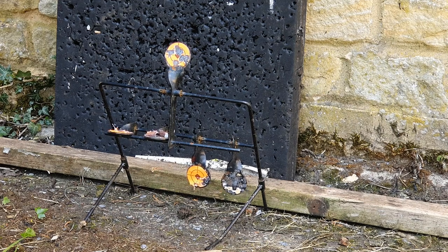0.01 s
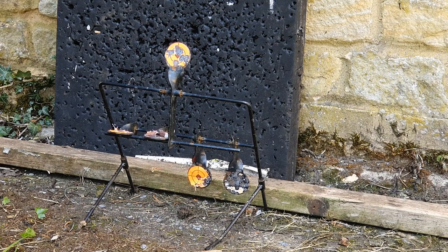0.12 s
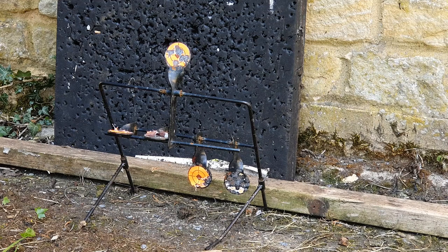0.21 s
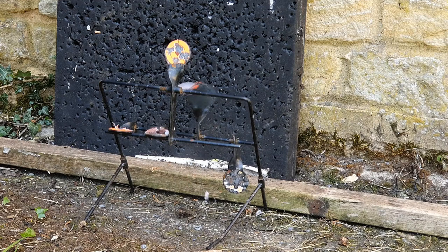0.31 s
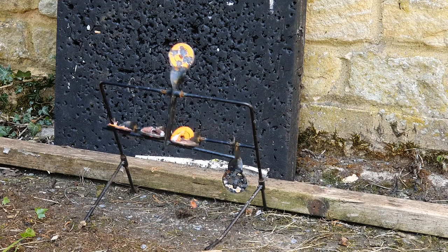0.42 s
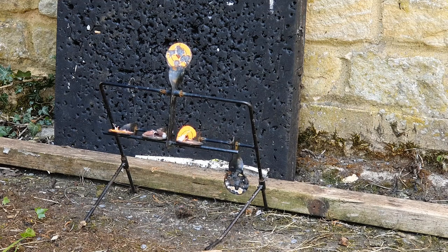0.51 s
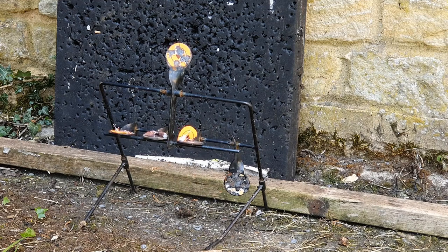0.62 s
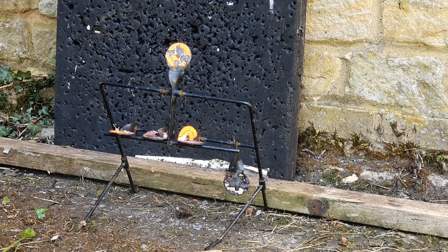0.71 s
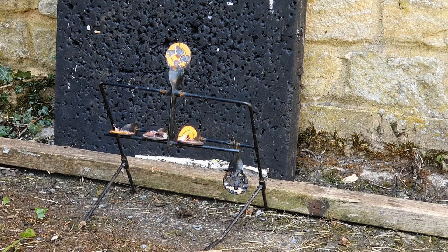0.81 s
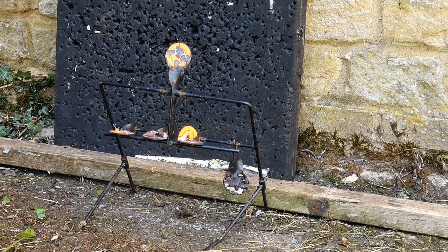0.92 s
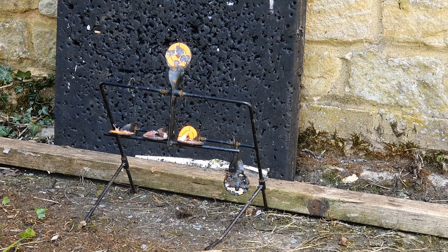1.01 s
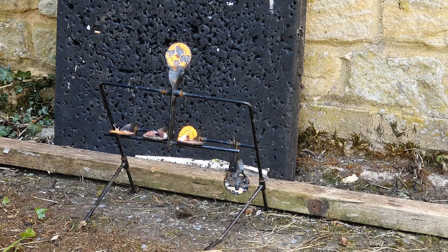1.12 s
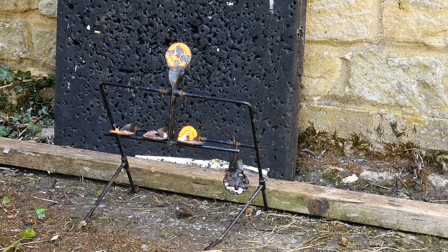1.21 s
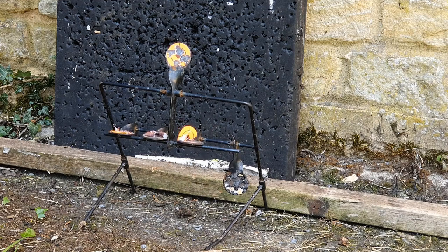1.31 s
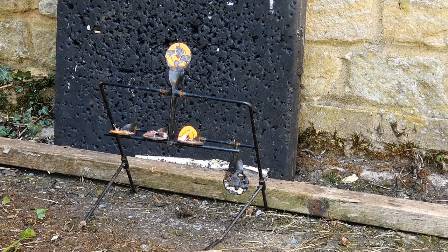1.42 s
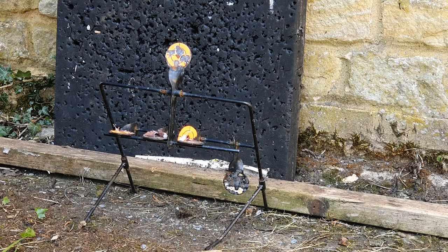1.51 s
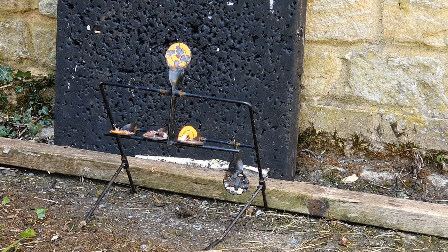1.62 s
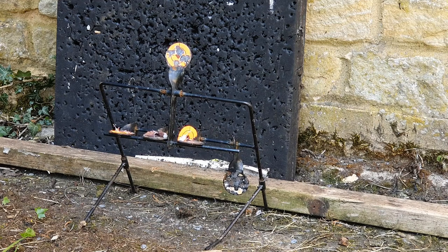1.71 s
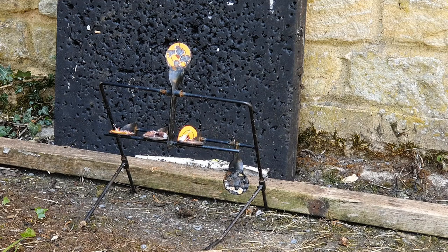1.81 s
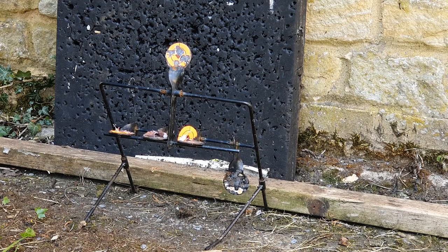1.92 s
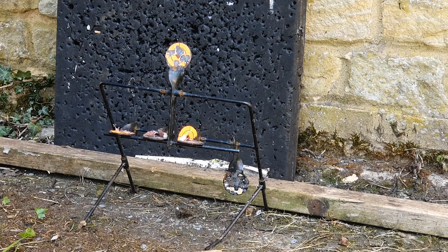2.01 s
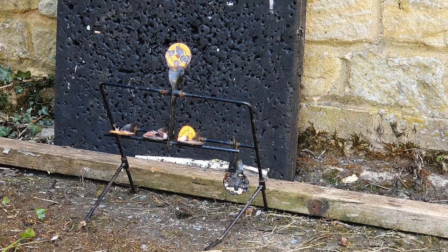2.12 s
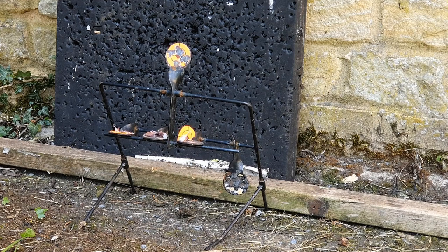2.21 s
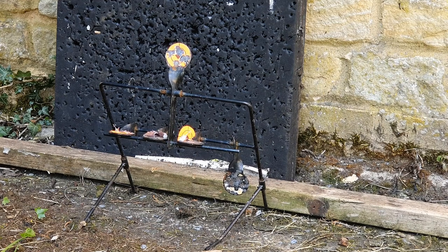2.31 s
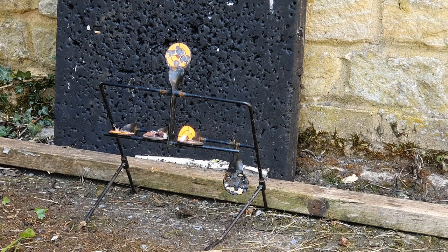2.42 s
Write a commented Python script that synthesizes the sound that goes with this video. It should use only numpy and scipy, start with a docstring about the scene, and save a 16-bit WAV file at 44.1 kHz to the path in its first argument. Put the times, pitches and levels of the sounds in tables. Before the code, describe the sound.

An air rifle shot hits a steel spinner target: near 0.24 s two sharp snaps with an air hiss and dull thud, a loud pellet smack at 0.27, then bright clangs at 0.38 and rapid rattling until 0.5, damped quickly with a short garden echo. Faint whistling birds come and go over low gusty microphone wind; a tiny tick at 1.47 and soft rustle at 1.9, faint clink at 2.13.

```python
"""An air rifle fires in a walled garden: two sharp snaps, a hiss of air and a dull thud.
The pellet smacks a steel spinner, which swings up, clangs against its stop and rattles briefly:
pulses and pings for the cracks, struck modes and noise for the steel.
A small tick and a soft rustle of shaped noise follow, with gliding-tone birds
and a light wind of gusty low noise on the microphone."""
import sys
import numpy as np
from scipy import signal
from scipy.fft import rfft, irfft, next_fast_len
from scipy.io import wavfile
from scipy.ndimage import map_coordinates

SR = 44100
rng = np.random.default_rng(int(sys.argv[2]) if len(sys.argv) > 2 else 0)


def generate_wav(signal):
    """Clip the signal to [-1, 1] and save it as 16-bit WAV at the path in sys.argv[1]."""
    frames = np.transpose(np.atleast_2d(signal))
    scaled = np.clip(frames, -1, 1) * 32767
    pcm = np.round(scaled).astype(np.int16)
    wavfile.write(sys.argv[1], SR, pcm)


N = 110250


def amp(db):
    """Decibels to gain."""
    return 10 ** (np.asarray(db) / 20)


def unit(x):
    """Scale to rms 1."""
    return x / np.sqrt(np.mean(x ** 2) + 1e-20)


def along(points, hz):
    """Interpolate (Hz, value) points on a log-frequency axis."""
    point_hz, value = np.transpose(points)
    return np.interp(np.log(hz + 1), np.log(point_hz + 1), value)


def clock():
    """Time of each sample, s."""
    return np.arange(N) / SR


def pan(left_minus_right_db):
    """Left and right gains for a level difference."""
    return amp(np.array([[left_minus_right_db], [-left_minus_right_db]]) / 2)


def wobble(rate_hz):
    """Smooth random curve, rate_hz knots a second."""
    knots = rng.standard_normal(int(N * rate_hz / SR) + 4)
    return map_coordinates(knots, [clock() * rate_hz])


def filtered(x, response):
    """Filter x by a response of frequency; padding keeps the tail from wrapping."""
    m = next_fast_len(N + SR // 2)
    spectrum = rfft(x, m) * response(np.fft.rfftfreq(m, 1 / SR))
    return irfft(spectrum, m)[..., :N]


def causal(gain_db):
    """Minimum-phase response with the given gain, by folding the cepstrum."""
    cepstrum = irfft(gain_db * np.log(10) / 20)
    half = len(cepstrum) // 2
    cepstrum[1:half] *= 2
    cepstrum[half + 1:] = 0
    return np.exp(rfft(cepstrum))


def white(side_db):
    """Stereo white noise of rms 1; side_db sets the width."""
    mid, side = rng.standard_normal((2, N))
    side = amp(side_db) * side
    return unit(np.array([mid + side, mid - side]))


def noise(colour, side_db):
    """Coloured stereo noise of rms 1."""
    return unit(filtered(white(side_db), lambda hz: amp(along(colour, hz))))


def envelope(start_s, attack_s, t60_s, hold_s=0):
    """Linear rise, hold, exponential fall."""
    age = clock() - start_s
    rise = np.clip(age / attack_s, 0, 1)
    return rise * amp(-60 * np.maximum(age - attack_s - hold_s, 0) / t60_s)


# echo decay: hz, t60_s
GARDEN_DECAY = [(100, .62), (400, .7), (700, .64), (2000, .47), (5000, .36), (9000, .27), (14000, .21)]
GARDEN_BUILD_S = 0.0079


def garden(x):
    """Walls and plants answer with a diffuse echo whose treble dies first."""
    hz, t, z = signal.stft(rng.standard_normal((2, SR)), SR, nperseg=256)
    decay = amp(-60 * t / along(GARDEN_DECAY, hz)[:, None])
    build = 1 - np.exp(-t / GARDEN_BUILD_S)
    tail = signal.istft(z * decay * build, SR, nperseg=256)[1]
    tail = tail / np.linalg.norm(tail[0])
    return signal.fftconvolve(x, tail, axes=1)[:, :N]


# wind on the microphone: time_s, rumble_db, left_minus_right_db
WIND_GUSTS = [(0, -56, -2), (0.061, -66.5, 5), (0.102, -50, 25), (0.141, -57, 16), (.22, -68.5, 10),
              (0.399, -54, 7), (.65, -67, 7.5), (.73, -51.5, -9), (0.799, -63, 8), (.88, -52.5, 13.5),
              (0.991, -69, 11.5), (1.1, -61.5, 10), (1.27, -72, 2), (1.45, -59, 11.5), (1.58, -62.5, 14),
              (1.69, -53, 19.5), (1.75, -66, 11), (1.85, -49, 20.5), (1.94, -56.5, 7), (2.08, -50.5, 9.5),
              (2.198, -60.5, -1), (2.5, -53.5, -1.5)]
# gust spectrum: hz, gain_db
RUMBLE_COLOUR = [(20, -16.5), (45, 1.5), (75, 3.5), (110, -5), (160, -24), (300, -34.5), (800, -65)]
# outdoor air spectrum: hz, gain_db
AIR_COLOUR = [(30, -2), (120, -3.5), (230, 0), (320, -10.5), (600, -20.5), (1500, -25), (4000, -29),
              (8000, -41.5), (15000, -34)]
# outdoor air level: time_s, level_db
AIR_LEVEL_CURVE = [(0, -67), (.7, -74.5), (1.2, -79), (1.6, -73.5), (2.0, -69.5), (2.5, -69.5)]


def breeze():
    """Wind gusts rumble mostly on the left port, over quiet outdoor air."""
    time_s, *columns = np.transpose(WIND_GUSTS)
    gust_db, lean_db = [np.interp(clock(), time_s, column) for column in columns]
    port_db = gust_db + np.array([lean_db, -lean_db]) / 2
    gusts = amp(port_db) * noise(RUMBLE_COLOUR, side_db=-6.5)
    air_db = np.interp(clock(), *np.transpose(AIR_LEVEL_CURVE))
    return gusts + amp(air_db) * noise(AIR_COLOUR, side_db=-1)


# bird notes: start_s, length_s, first_hz, last_hz, level_db, roughness (0-1)
BIRD_NOTES = [(-.04, .17, 1768, 1763, -67.5, 0.07), (0.13, 0.144, 1755, 1750, -77, .03),
              (.165, 0.12, 5240, 4870, -63.5, 0.25), (0.545, 0.2, 1738, 1746, -77.5, 0.11),
              (0.808, 0.1828, 2619, 2560, -80.5, 0.1), (0.878, 0.1255, 4350, 4200, -90.5, 0.17),
              (0.977, 0.1755, 2546, 2535, -71.5, 0.04), (1.128, 0.15, 2520, 2518, -77, 0.04),
              (1.307, 0.066, 5625, 5350, -74.5, 0.7), (1.311, .14, 5200, 4745, -65.5, .25),
              (1.46, 0.13, 4900, 4986, -88.5, 0.2), (2.164, 0.072, 4203, 4264, -73, 0.88),
              (2.167, 0.0729, 4969, 4933, -77.5, 0.69)]
ROUGH_HZ, BIRD_WET_DB = 330, -4


def birds():
    """Distant whistled notes: swelling glides with a random flutter in pitch."""
    song, t = np.zeros(N), clock()
    for start_s, length_s, first_hz, last_hz, level_db, roughness in BIRD_NOTES:
        progress = np.clip((t - start_s) / length_s, 0, 1)
        glide_hz = first_hz + (last_hz - first_hz) * progress
        pitch_hz = glide_hz + ROUGH_HZ * roughness * wobble(400)
        whistle = np.sqrt(2) * np.sin(2 * np.pi * np.cumsum(pitch_hz) / SR)
        song += amp(level_db) * np.sin(np.pi * progress) * whistle
    song = np.array([song, song])
    return song + amp(BIRD_WET_DB) * garden(song)


# handling noises: start_s, level_db, attack_s, t60_s, centre_hz, width_octaves
HANDLING_NOISES = [(1.467, -54.5, .0004, .012, 11280, 0.034), (1.466, -64.5, 0.00049, .04, 6200, 1.66),
                   (1.466, -73.5, .002, 0.21, 11600, 1), (1.888, -73.5, 0.0196, 0.26, 2277, 0.688),
                   (1.887, -81, 0.0142, 0.27, 6955, 0.1877), (2.133, -76, 0.00319, 0.086, 2201, .6),
                   (2.135, -71.5, .004, 0.554, 2339, 0.0336)]


def handling():
    """A small tick, a soft rustle and a faint clink: enveloped bands of noise."""
    out = np.zeros((2, N))
    for start_s, level_db, attack_s, t60_s, centre_hz, width_octaves in HANDLING_NOISES:
        def resonance(hz):
            return 1 / (1 + (np.log2((hz + 1) / centre_hz) / width_octaves) ** 2)
        band = unit(filtered(white(side_db=-2.5), resonance))
        out += amp(level_db) * band * envelope(start_s, attack_s, t60_s)
    return out * pan(-3.5)


# plate modes: hz, level_db, t60_s
PLATE_MODES = [(3465, -43, .19), (4660, -33, .17), (4778, -29.5, .195), (5295, -35, .23), (8035, -33, .25),
               (10115, -37, .21), (10345, -35, .19), (10452, -31.5, .22), (11690, -43, .25),
               (13740, -37, .24), (15190, -32, .17), (15730, -37, .2)]
# rod frame modes: hz, level_db, t60_s
FRAME_MODES = [(2374, -46, .28), (6460, -42, .42), (6853, -43, .43)]
SPLIT_HZ, MODE_SCATTER_DB, TWIN_DB = 35, -0.5, -6.5
FAVOUR_DB, FAVOUR_HZ = 10, 453


def ring(modes, start_s, favoured_hz):
    """Struck modes: beating pairs, louder near the pitch favoured by the point of contact."""
    out, age = np.zeros((2, N)), clock()[:SR]
    for hz, level_db, t60_s in modes:
        scatter, split = rng.standard_normal(2)
        phase = rng.uniform(0, 2 * np.pi, (2, 2, 1))
        main = np.sin(2 * np.pi * hz * age + phase[0])
        twin = np.sin(2 * np.pi * (hz + SPLIT_HZ * split) * age + phase[1])
        favour_db = FAVOUR_DB * np.exp(-((hz - favoured_hz) / FAVOUR_HZ) ** 2)
        strike_db = level_db + favour_db + MODE_SCATTER_DB * scatter
        out[:, round(start_s * SR):][:, :SR] += (main + amp(TWIN_DB) * twin) * amp(strike_db - 60 * age / t60_s)
    return out


# blows on the spinner: start_s, ring_db, clash_db, left_minus_right_db, favoured_hz
SPINNER_BLOWS = [(0.276, -9.5, -26, -4.5, 10300), (0.3793, -2, -20, 1.5, 4640),
                 (0.3814, -2, -16, -3, 10100), (.4022, -8, -30.5, -3.5, 4700),
                 (0.4339, -3.5, -37.5, 12, 13700), (0.44, -12.5, -41, -15, 5300),
                 (.4620, -18, -52.5, 7, 5220), (.4777, -13, -36, -9.5, 7850)]
# clash spectrum: hz, gain_db
CLASH_SPECTRUM = [(200, -32), (800, -21), (1500, -5), (2400, -13.5), (3500, -0.5), (5200, -0.5),
                  (7500, -0.5), (9000, -9.5), (10400, 0), (12800, -7), (15500, -5.5)]
CLASH_T60_S, FRAME_DB, FRAME_T60_S = 0.034, -9, 0.29
CLUSTER_DB, CLUSTER_HZ = 8, 300  # crowded modes around the favoured pitch
REST_S, REST_T60_S = 0.49804, 0.0984  # the plate rests on its stop, which damps it
STEEL_WET_DB = -19


def spinner():
    """Blows ring plate and frame and set off a dense clash; plate and clash are damped at rest."""
    out = np.zeros((2, N))
    free = amp(-60 * np.maximum(clock() - REST_S, 0) / REST_T60_S)
    for start_s, ring_db, clash_db, pan_db, favoured_hz in SPINNER_BLOWS:
        tones = free * ring(PLATE_MODES, start_s, favoured_hz) + ring(FRAME_MODES, start_s, favoured_hz)

        def cluster(hz):
            return amp(CLUSTER_DB / (1 + ((hz - favoured_hz) / CLUSTER_HZ) ** 2))
        clash = unit(filtered(noise(CLASH_SPECTRUM, side_db=-1), cluster))
        shape = envelope(start_s, .0003, CLASH_T60_S)
        shape = shape + amp(FRAME_DB) * envelope(start_s, .0007, FRAME_T60_S)
        out += pan(pan_db) * (amp(ring_db) * tones + amp(clash_db) * free * shape * clash)
    return out + amp(STEEL_WET_DB) * garden(out)


# thuds of the spring and of the pellet: start_s, level_db, attack_s, hold_s, t60_s, centre_hz
DULL_THUDS = [(.238, -33.5, .003, .023, .05, 140), (.276, -36, .003, .016, .07, 55)]
# thud spectrum: hz, gain_db
THUD_SPECTRUM = [(30, 0), (200, -1), (500, 1.5), (800, -8.5), (1400, 0.5), (4000, -2), (15000, -17)]
THUD_OCTAVES, THUD_SKIRT_DB, THUD_WET_DB = 1.1, -16, -10


def thuds():
    """The spring shakes the rifle and the pellet jolts the stand: low bursts with a rough skirt."""
    out = np.zeros((2, N))
    for start_s, level_db, attack_s, hold_s, t60_s, centre_hz in DULL_THUDS:
        def hump(hz):
            octaves = np.log2((hz + 1) / centre_hz)
            return amp(THUD_SKIRT_DB) + np.exp(-(octaves / THUD_OCTAVES) ** 2)
        burst = unit(filtered(noise(THUD_SPECTRUM, side_db=-8.5), hump))
        out += amp(level_db) * burst * envelope(start_s, attack_s, t60_s, hold_s)
    return out + amp(THUD_WET_DB) * garden(out)


# air leaving the muzzle: start_s, level_db, attack_s, hold_s, t60_s
MUZZLE_PUFF = (.2395, -29, .003, .022, .03)
# hiss spectrum: hz, gain_db
PUFF_SPECTRUM = [(200, -10.5), (1300, 1.5), (3500, 1.5), (7000, -1.5), (11000, -3.5), (15500, -2.5)]
PUFF_WET_DB = -7.5


def puff():
    """Compressed air hisses from the muzzle behind the pellet: a burst of coloured noise."""
    start_s, level_db, attack_s, hold_s, t60_s = MUZZLE_PUFF
    hiss = noise(PUFF_SPECTRUM, side_db=-2) * envelope(start_s, attack_s, t60_s, hold_s)
    hiss = amp(level_db) * hiss
    return pan(-0.5) * (hiss + amp(PUFF_WET_DB) * garden(hiss))


# the rifle's two snaps and the pellet's smack: start_s, snap_db, ping_db, ping_hz,
# scatter_db, scatter_t60_s, garden_db, left_minus_right_db, right_lag_s
SHOT_CRACKS = [(0.2419, 6, -3.5, 6253, -3, 0.022, 0, -4, .00016),
               (.2510, 4.5, -2, 4013, -2.5, 0.038, -2, -3.5, 0.000022),
               (.2748, 11, -11.5, 6000, 5, .02, 9, -0.5, .00001)]
# snap spectrum: hz, gain_db
SNAP_SPECTRUM = [(100, -10), (600, -13.5), (1500, -11), (3000, -2.5), (6500, -1), (9000, -1.5),
                 (15500, -6.5)]
PING_S, PING_ECHO_DB = .00014, -14.5  # time to ping peak; ping level sent to the echoes


def cracks():
    """Each crack is a sharp pulse and a ping of a few cycles, scattered by nearby surfaces."""
    out = np.zeros((2, N))
    for (start_s, snap_db, ping_db, ping_hz, scatter_db, scatter_t60_s,
         garden_db, pan_db, right_lag_s) in SHOT_CRACKS:
        onsets_s = np.array([[start_s], [start_s + right_lag_s]])
        pulse = 1. * (np.arange(N) == np.round(onsets_s * SR))
        snap = filtered(pulse, lambda hz: causal(along(SNAP_SPECTRUM, hz)))
        age = np.maximum(clock() - onsets_s, 0)
        swell = age / PING_S * np.exp(1 - age / PING_S)
        ping = amp(ping_db) * swell * np.sin(2 * np.pi * ping_hz * age)
        scatter = white(side_db=8) * envelope(0, 0.00025, scatter_t60_s)
        scatter = amp(scatter_db) * scatter / np.linalg.norm(scatter[0])
        spread = snap + amp(PING_ECHO_DB) * ping
        echoes = signal.fftconvolve(spread, scatter, axes=1)[:, :N]
        echoes = echoes + amp(garden_db) * garden(spread)
        out += pan(pan_db) * (amp(snap_db) * snap + ping + echoes)
    return out


DIP_S, DIP_WIDTH_S, DIP_DB = 2.164, .015, -20  # centre, half-width, depth


def scene():
    """Shot and target over the garden's background, whose level dips briefly once."""
    dip = amp(DIP_DB * np.exp(-((clock() - DIP_S) / DIP_WIDTH_S) ** 2))
    background = birds() + handling() + breeze()
    return cracks() + puff() + thuds() + spinner() + dip * background


# difference between microphone ports: hz, left_minus_right_db
PORT_DIFFERENCE = [(100, 2), (1000, 0), (3000, 1), (6000, -1), (9000, -6.5), (14000, 2)]
# stereo width: hz, side_gain_db
PORT_SIDE = [(100, -2.5), (1300, -0.5), (3000, 1), (5500, -2), (10000, 1)]
CLIP_LEVEL, TOP_HZ = .9, 16000


def record(dry):
    """Two unlike microphone ports, clipping near full scale, and a steep band limit."""
    mid = (dry[0] + dry[1]) / 2
    side = filtered((dry[0] - dry[1]) / 2, lambda hz: amp(along(PORT_SIDE, hz)))

    def balance(hz):
        return amp(np.outer([1, -1], along(PORT_DIFFERENCE, hz)) / 2)
    ports = filtered(np.array([mid + side, mid - side]), balance)
    clipped = np.clip(ports, -CLIP_LEVEL, CLIP_LEVEL)
    return filtered(clipped, lambda hz: 1 / (1 + (hz / TOP_HZ) ** 120))


dry = scene()
out = record(dry)
generate_wav(out)
```